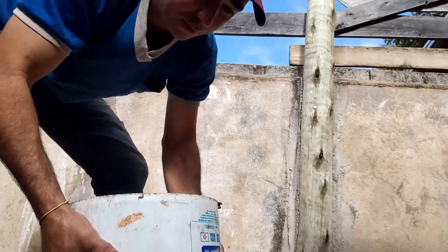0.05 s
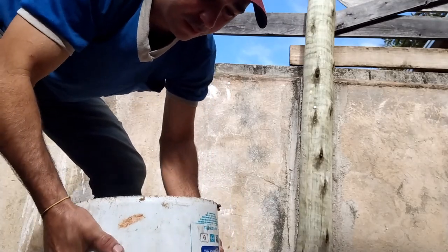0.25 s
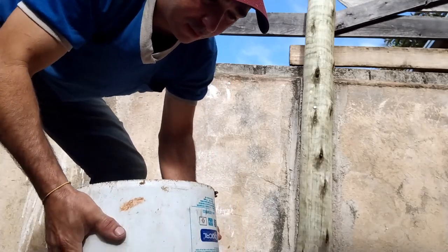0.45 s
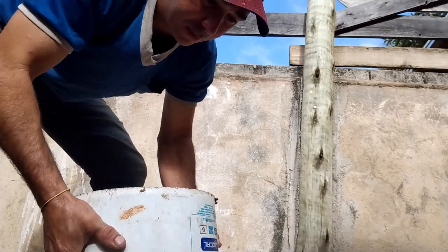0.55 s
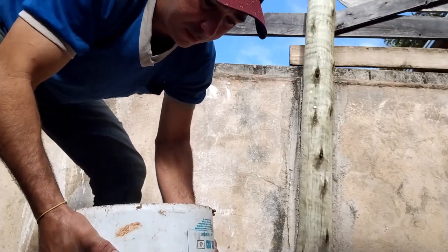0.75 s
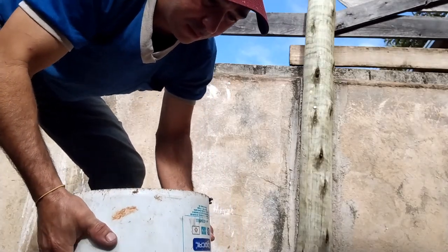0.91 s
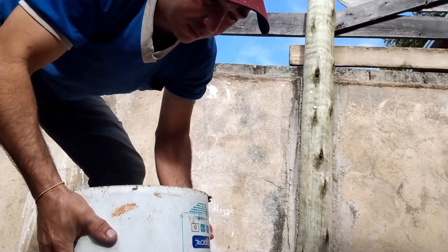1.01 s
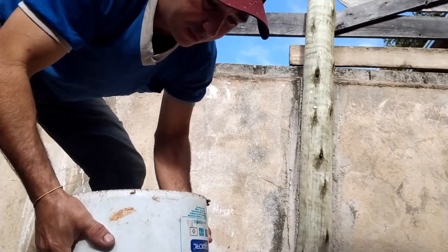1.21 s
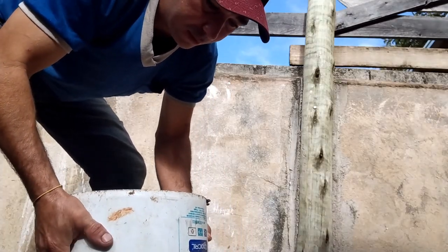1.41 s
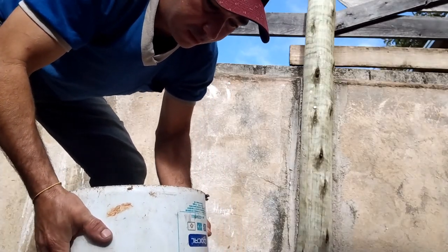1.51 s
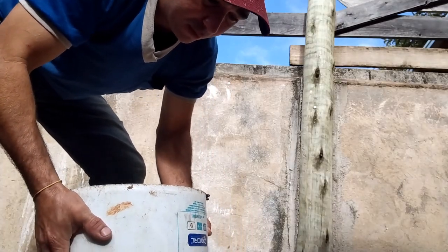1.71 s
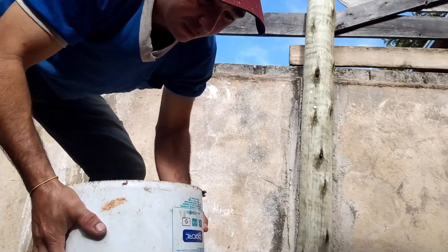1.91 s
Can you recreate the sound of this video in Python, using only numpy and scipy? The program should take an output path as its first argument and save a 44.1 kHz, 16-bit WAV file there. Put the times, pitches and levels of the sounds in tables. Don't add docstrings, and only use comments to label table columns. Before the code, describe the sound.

Hollow plastic bucket thumped down on grit and dragged by hand, a little water gulping inside

```python
import sys
import numpy as np
from scipy import signal
from scipy.fft import rfft, irfft, next_fast_len
from scipy.io import wavfile
from scipy.ndimage import uniform_filter1d, map_coordinates

SR = 44100
rng = np.random.default_rng(int(sys.argv[2]) if len(sys.argv) > 2 else 0)


def wav_record(signal):
    frames = np.transpose(np.atleast_2d(signal))
    bounded = np.clip(frames, -1, 1)
    quanta = np.round(bounded * 32767).astype(np.int16)
    wavfile.write(sys.argv[1], SR, quanta)


def ratio_of_db(decibels):
    return 10 ** (np.asarray(decibels, float) / 20)


N = 85995
EAR_LAG_SAMPLES = 4


def unit(x):
    return x / np.sqrt(np.mean(x ** 2) + 1e-20)


def along(points, hz):
    f, v = np.transpose(points)
    return np.interp(np.log(hz + 1), np.log(f + 1), v)


def curves(rows):
    s, *cols = np.transpose(rows)
    return [np.interp(np.arange(N) / SR, s, c) for c in cols]


def wobble(rate_hz):
    knots = rng.standard_normal(int(N * rate_hz / SR) + 4)
    return map_coordinates(knots, [np.arange(N) * rate_hz / SR])


def filtered(x, response):
    m = next_fast_len(N + SR // 2)
    return irfft(rfft(x, m) * response(np.fft.rfftfreq(m, 1 / SR)), m)[..., :N]


def peak(f, hz, width_hz):
    return 1j * f * width_hz / (hz * hz - f * f + 1j * f * width_hz)


def spread(pair, spectrum, alike):
    def response(hz):
        turn = np.arccos(np.clip(along(alike, hz), -1, 1)) / 2
        return ratio_of_db(along(spectrum, hz)) * [np.cos(turn), np.sin(turn)]

    mid, side = filtered(pair, response)
    return unit(np.array([mid + side, mid - side]))


def grains(per_s, spread_db):
    level_db = spread_db * np.minimum(rng.exponential(size=(2, N)), 2.5)
    size = ratio_of_db(level_db) * rng.standard_normal((2, N))
    return unit(size * (rng.random((2, N)) < per_s / SR))


def add(out, x, s):
    part = out[..., round(s * SR):][..., :x.shape[-1]]
    part += x[..., :part.shape[-1]]


# frequency in Hz, left-right likeness.
NEAR_ALIKE = [(300, 0.84), (1500, 0.39), (8000, 0.1)]


def snap_noise(spectrum):
    left, right = spread(rng.standard_normal((2, N)), spectrum, NEAR_ALIKE)
    return np.array([np.roll(left, EAR_LAG_SAMPLES), right])


# start in seconds, level in dB, contact in ms, crack level in dB, crack t60 in seconds.
BLOWS = [(.2065, -7, 17, -29, 0.085), (.2116, -12.5, 1.57, -11, 0.012), (.2137, -5, 2.4, -13, 0.013),
         (.2174, -11, 1.68, -9, 0.0065), (.238, -11.5, 12, -41, 0.033), (.7398, -32, 1.4, -23.5, 0.15),
         (.7545, -12, 0.44, -6, 0.0042), (.7665, -22, 3.6, -38, 0.018), (.771, -18, 1.8, -30, 0.17),
         (.815, -34, 0.92, -47, .03), (.823, -29, 3, -43, .03)]
# frequency in Hz, level in dB, t60 in seconds.
SHELL = [(127, -12, 0.021), (215, 9, 0.025), (293, -4, 0.041), (396, -7.5, 0.026), (475, 10.5, 0.014),
         (630, -3, 0.052), (826, -9, 0.084), (867, -8, 0.063), (1200, -1, 0.031), (1540, -34, 0.026),
         (1944, -27, 0.016), (1090, -5, 0.024)]
# frequency in Hz, level in dB, t60 in seconds.
BASE = [(63, 8, 0.073), (99, 2.5, 0.04), (265, 4, 0.017), (1060, -14, .04)]
# start in seconds, level in dB, t60 in seconds.
DUST = [
    (0.214, -22, 0.18),
    (0.751, -30.5, 0.18),
]
# frequency in Hz, level in dB per Hz.
CRACK = [(350, -5.5), (600, -8.5), (2900, -21.5), (6700, -26.5), (9600, -26), (15500, -40)]
# frequency in Hz, left-right likeness.
ALIKE = [(100, 1), (220, 0.96), (400, 0.92), (1000, 0.23), (4000, 0.36), (12000, 0.058)]


def knocks():
    body, crack, dust = np.zeros((3, N))
    t = np.arange(SR // 3) / SR
    shell = sum(ratio_of_db(db - 60 * t / t60) * np.sin(2 * np.pi * hz * t) for hz, db, t60 in SHELL)
    shell = signal.lfilter(*signal.butter(2, 95, "high", fs=SR), shell)
    drum = sum(ratio_of_db(db - 60 * t / t60) * np.sin(2 * np.pi * hz * t) for hz, db, t60 in BASE)
    for k, (s, db, contact_ms, crack_db, t60) in enumerate(BLOWS):
        u = t[:800] / (contact_ms / 4000)
        push = u * np.exp(-u)
        way = -1 if k == 0 else 1
        ring = signal.fftconvolve(shell + (k == 1) * drum, push / push.sum())
        add(body, way * ratio_of_db(db - 3.0) * ring, s)
        add(crack, ratio_of_db(crack_db - 60 * t / t60) * np.tanh(t / (0.031 * t60)), s)
    for s, db, t60 in DUST:
        add(dust, ratio_of_db(db - 60 * t / t60) * np.tanh(t / 0.0027), s)
    body = np.array([np.roll(body, EAR_LAG_SAMPLES), body]) * ratio_of_db([[-.7], [.7]])
    dusty = dust * spread(rng.standard_normal((2, N)), CRACK, ALIKE)
    return body + crack * snap_noise(CRACK) + dusty


# time in seconds, body push in dB, grit level in dB.
DRAG = [(0, -45.5, -53.5), (.07, -44.5, -44), (.135, -50.5, -60.5), (.26, -45, -45.5), (.45, -40, -49),
        (.51, -50, -57.5), (.71, -50.5, -54.5), (.83, -43, -51), (.96, -38.5, -39.5), (1.12, -46, -51),
        (1.28, -38.5, -40.5), (1.35, -42, -48.5), (1.4, -39, -44), (1.56, -37, -41), (1.685, -41.5, -41),
        (1.76, -52, -57.5), (1.81, -44, -49.5), (1.95, -50, -45.5)]
# frequency in Hz, width in Hz, level in dB.
HOLLOW = [(144.5, 32.4, -2.5), (202.5, 21, 1.5), (268, 31.2, -1), (341, 28.5, -3), (412.7, 11, 4.5),
          (457, 23.2, -3.5), (833, 413, -16.5), (1349, 148, -19), (2030, 400, -26.5)]
# frequency in Hz, level in dB per Hz.
GRIT = [(900, -16.5), (2200, -13), (3800, -12), (5500, -15), (8300, -11), (11500, -20), (15600, -27.5),
        (16500, -53)]


def drag():
    push_db, grit_db = curves(DRAG)
    slip_wobble_db, hiss_wobble_db, patch_db, pebble_db = .8, 1, 2, -7.5
    low_grows = 0.38
    slips = grains(900, spread_db=2.5) + 0.19 * rng.standard_normal((2, N))
    slips = slips * ratio_of_db(slip_wobble_db * wobble(29.72))

    def ring(modes):
        def response(f):
            return sum((-1) ** k * ratio_of_db(db) * peak(f, hz, width_hz)
                       for k, (hz, width_hz, db) in enumerate(modes))

        return spread(filtered(slips, response), [(60, -36), (130, -5.0), (3000, 4.0), (6000, -30)], ALIKE)

    body = ratio_of_db(low_grows * (push_db + 44) - 1.0) * ring(HOLLOW[:3]) + ratio_of_db(1) * ring(HOLLOW[3:])
    grit = grains(4000, spread_db=1.5) + 1.26 * rng.standard_normal((2, N))
    z = signal.stft(grit, nperseg=256)[2]
    patches = uniform_filter1d(rng.standard_normal(z.shape[1:]), 8, 0)
    patches = unit(uniform_filter1d(patches, 5, 1))
    grit = signal.istft(z * ratio_of_db(patch_db * patches), nperseg=256)[1][:, :N]
    hiss = spread(grit, [(400, -17.5)] + GRIT, ALIKE)
    grit_level = ratio_of_db(grit_db + hiss_wobble_db * wobble(40.4))
    return ratio_of_db(push_db) * body + grit_level * (hiss + ratio_of_db(pebble_db) * pebbles())


def pebbles():
    count, centre_hz, decay_cycles = 500, 4626, 32
    when, pitch, size, pan, lag = rng.random((count, 5)).T[..., None]
    hz = np.clip(centre_hz * np.exp(1.67 * (pitch - .5)), 500, 14000)
    c = hz * np.arange(500) / SR
    level = ratio_of_db(-5 * np.log(1 - .97 * size) - 60 * c / decay_cycles / 2)
    ring = level * np.tanh(c / 2) * np.sin(2 * np.pi * c)
    at = (when * N).astype(int) + np.arange(500)
    ears = []
    for w in (0, 1):
        place = at + (w * 8 * lag).astype(int)
        heard = ring * (1 + w * (pan - .5))
        ears.append(np.bincount(place.ravel(), heard.ravel(), N + 600)[:N])
    return unit(np.array(ears))


# start in seconds, peak in dB.
RAPS = [(.099, -43), (.323, -38), (.426, -35), (.496, -38.5), (.515, -41), (.593, -33.5), (.932, -29.5),
        (1.07, -29), (1.35, -29), (1.379, -41.5), (1.388, -36), (1.398, -30), (1.412, -41), (1.425, -36),
        (1.48, -25.5), (1.493, -30), (1.511, -34), (1.522, -25.5), (1.531, -37), (1.553, -42), (1.563, -39),
        (1.583, -23), (1.604, -44), (1.63, -41), (1.671, -34)]
# frequency in Hz, level in dB, t60 in seconds.
RIM = [(630, 2.5, .02), (823, -0.5, 0.031), (1010, -1.5, 0.032), (1256, -8.5, 0.05), (1555, 3, 0.0068),
       (2096, -9, 0.017)]


def raps():
    out, t = np.zeros((2, N)), np.arange(SR // 16) / SR
    hz, level_db, t60 = np.transpose(RIM)[..., None]
    draws = rng.standard_normal((len(RAPS), 3, len(RIM), 1))
    for (s, db), (balance, detune, pan) in zip(RAPS, draws):
        tone = np.sin(2 * np.pi * hz * (1 + 0.054 * detune) * t)
        scrape = uniform_filter1d(rng.standard_normal(len(t)), size=12) * ratio_of_db(-60 * t / 0.0058)
        modes = ratio_of_db(level_db + 4.5 * balance - 60 * t / t60) * (tone + .5 * scrape)
        pair = np.array([modes.sum(0), (modes * ratio_of_db(1.4 * pan)).sum(0)])
        add(out, ratio_of_db(db - 7.5) * pair * np.tanh(t / 0.00039), s)
    return out


# start in seconds, level in dB, frequency in Hz, t60 in seconds.
STONES = [(.015, -36.5, 1360, 0.037), (.16, -41, 1785, 0.059), (.443, -38.5, 3520, .04),
          (.546, -53, 4760, 0.17), (.582, -43, 5000, 0.047), (.669, -41, 4270, 0.034),
          (.733, -38, 8300, .03), (.7398, -34, 2230, 0.055), (1.185, -31, 2140, 0.04),
          (1.342, -36.5, 1780, 0.026), (1.385, -55, 2050, .1), (1.47, -35.5, 3580, 0.022),
          (1.493, -34, 2290, 0.043), (1.539, -30, 3520, 0.032), (1.552, -35, 3500, 0.027),
          (1.564, -38, 1970, 0.066), (1.582, -45, 3640, 0.034), (1.665, -35, 4280, 0.025),
          (1.684, -38.5, 2230, 0.12), (1.776, -36, 3910, 0.064)]


def stones():
    out, t = np.zeros((2, N)), np.arange(SR // 16) / SR
    roughness = 1.6
    for s, db, hz, t60 in STONES:
        drift = np.cumsum(rng.standard_normal((2, len(t))), 1) * roughness * np.sqrt(hz) / 1000
        ping = np.sin(2 * np.pi * hz * t + drift)
        add(out, ratio_of_db(db - 60 * t / t60) * np.tanh(t / 0.0005) * ping, s)
    return out


# start in seconds, peak in dB, frequency in Hz.
GULPS = [(0.365, -23.5, 331), (0.404, -22.5, 335), (0.442, -24.5, 358), (0.503, -22.5, 454),
         (0.517, -28.5, 262), (0.585, -33.5, 423), (0.877, -25, 259), (0.909, -22.5, 296),
         (0.934, -24.5, 338), (0.965, -25, 265), (0.98, -27, 227), (1.065, -28.5, 139), (1.18, -23, 413),
         (1.267, -23, 375), (1.286, -21, 264), (1.304, -21, 393), (1.391, -23.5, 249),
         (1.395, -26.5, 142.6), (1.255, -42, 111), (0.06, -33.5, 387), (0.455, -35, 427), (1.515, -22, 383),
         (1.483, -20.5, 224), (1.538, -26.5, 277), (1.635, -21.5, 233), (1.67, -23, 205),
         (1.724, -31.5, 432), (1.772, -27.5, 402), (1.814, -31.5, 427), (1.852, -26.5, 414),
         (1.875, -27.5, 215), (1.936, -26, 353)]


def gulps():
    out, t = np.zeros((2, N)), np.arange(SR // 8) / SR
    decay_cycles, rise, gain_db, sway_db, lag_ms = 5.4, 0.028, 2.5, -0.5, 0.21
    ears = np.array([[.5], [-.5]])
    for (s, db, hz), (sway, side) in zip(GULPS, rng.standard_normal((len(GULPS), 2))):
        lag_s = lag_ms / 1000 * np.abs(side) * (.5 + np.sign(side) * ears)
        c = hz * np.maximum(t - lag_s, 0)
        level = ratio_of_db(db + gain_db - 20 * c / decay_cycles) * np.tanh(c / 0.93)
        ring = level * np.sin(2 * np.pi * c * (1 + rise * c / decay_cycles))
        add(out, ring * ratio_of_db(sway_db * sway * ears), s)
    return out


# start in seconds, peak in dB, t60 in seconds, centre in Hz.
TICKS = [(0.1584, -32, 0.27, 9600), (0.308, -43.5, 0.31, 7260), (0.405, -27, 0.044, 7400),
         (.44, -32, 0.073, 8500), (0.586, -36, 0.046, 4800), (0.634, -29, 0.032, 8100),
         (0.666, -30.5, .04, 6900), (0.854, -30.5, 0.21, 2020), (0.964, -24.5, 0.04, 980),
         (1.159, -32, 0.025, 1400), (1.1645, -24.5, 0.031, 7260), (1.1845, -17, 0.027, 7650),
         (1.203, -22, 0.032, 4900), (1.215, -22, 0.027, 7500), (1.32, -31, 0.045, 8250),
         (1.3782, -27.5, 0.074, 1000), (1.47, -23, 0.035, 3600), (1.542, -24.5, 0.089, 7400),
         (1.681, -25, 0.023, 8900), (1.7266, -29.5, 0.069, 4340), (1.774, -21, 0.033, 8100),
         (1.777, -29.5, 0.25, 2600), (1.923, -30.5, 0.24, 8100)]


def ticks():
    out, t = np.zeros((2, N)), np.arange(SR // 6) / SR
    focus = 1.1
    noise = snap_noise([(700, -9.5)] + GRIT[1:])
    for s, db, t60, hz in TICKS:
        n = noise[:, round(s * SR):][:, :len(t)]
        u = t[:n.shape[1]]
        b, a = signal.iirpeak(hz, 2.2, SR)
        burst = unit(unit(n) + focus * unit(signal.lfilter(b, a, n)))
        add(out, ratio_of_db(db - 6 - 60 * u / max(t60, .005)) * np.tanh(u / 0.00053) * burst, s)
    return out


# frequency in Hz, t60 in seconds.
WALLS = [(100, 0.38), (1000, 0.15), (10000, 0.18)]


def walls(x):
    hz, t, z = signal.stft(rng.standard_normal((2, SR // 2)), SR, nperseg=256)
    turn = np.arccos(np.clip(along(ALIKE, hz), -1, 1))[:, None] / 2
    z = np.cos(turn) * z[0] + np.sin(turn) * np.array([z[1], -z[1]])
    decay = ratio_of_db(-60 * t / along(WALLS, hz)[:, None])
    tail = signal.istft(z * decay, SR, nperseg=256)[1]
    late = np.pad(x, ((0, 0), (400, 0)))
    return signal.fftconvolve(late, tail / np.linalg.norm(tail[0]), axes=1)[:, :N]


# time in seconds, level in dB.
WIND = [(0, -48), (.07, -48), (.15, -42.5), (.3, -44), (.45, -50.5), (.6, -44.5), (.9, -55), (1.14, -52),
        (1.3, -54.5), (1.6, -55), (1.95, -55.5)]
# frequency in Hz, level in dB per Hz.
RUMBLE = [(15, -6.5), (50, 3), (120, -9.5), (260, -55)]
# centre in seconds, peak in dB.
PUFFS = [(0.306, -24), (0.321, -27.5), (0.368, -26), (0.584, -40), (0.67, -29.5), (1.137, -44),
         (1.351, -33.5)]


def wind():
    level_db, = curves(WIND)
    puff_ms = 2
    low = spread(rng.standard_normal((2, N)), RUMBLE, [(30, 0.68), (100, 0.43)])
    t = np.arange(N) / SR
    puffs = np.zeros(N)
    for s, db in PUFFS:
        way = -1 if .33 < s < .6 else 1
        puffs += way * ratio_of_db(db) * np.exp(-((t - s) * 1000 / puff_ms) ** 2 / 2)
    puffs = puffs - uniform_filter1d(puffs, size=2000)
    return ratio_of_db(level_db + 4) * unit(ratio_of_db(0.94 * wobble(13.2)) * low) + puffs


def scene():
    near = knocks() + raps() + stones() + gulps() + ticks()
    return near + ratio_of_db(-11.0) * walls(near) + drag() + wind()


def roll_off(x):
    return signal.sosfilt(signal.butter(12, 16670, fs=SR, output="sos"), x)


def record(dry):
    low_cut_hz, band_hz, ceiling = 33, 15850, .74

    def band(hz):
        return np.where(hz < band_hz, 1, ratio_of_db(-24)) / np.sqrt(1 + (low_cut_hz / (hz + 1)) ** 4)

    heard = filtered(dry, band)
    return roll_off(heard / (1 + (heard / ceiling) ** 4) ** (1 / 4))


dry = scene()
out = record(dry)
wav_record(out)
```